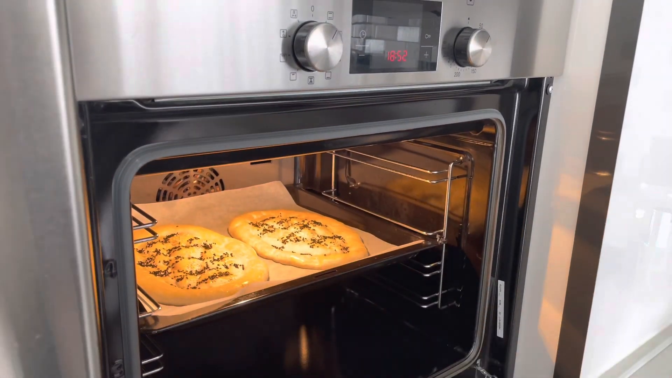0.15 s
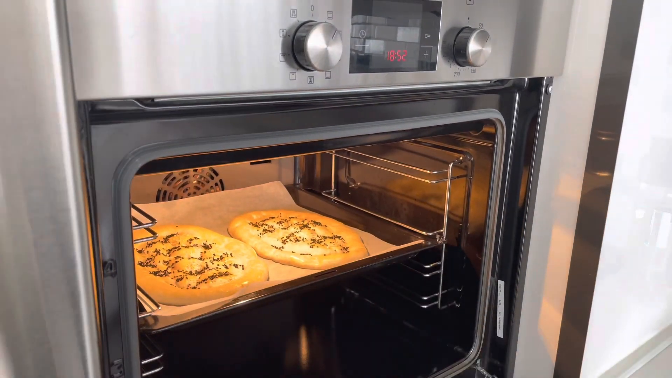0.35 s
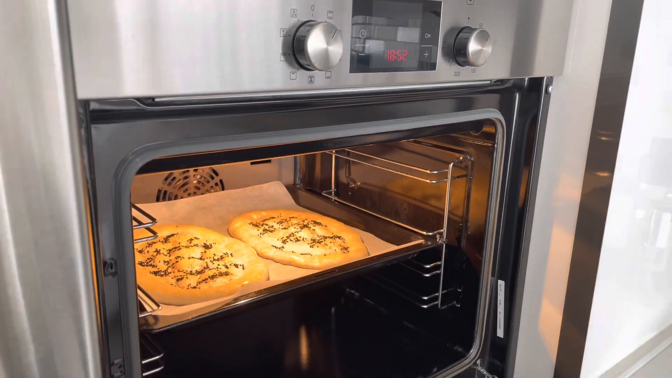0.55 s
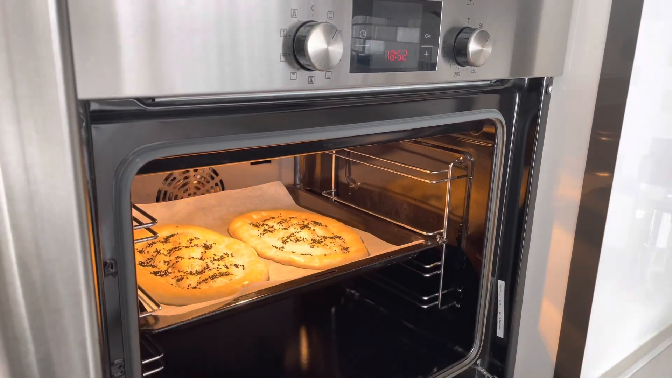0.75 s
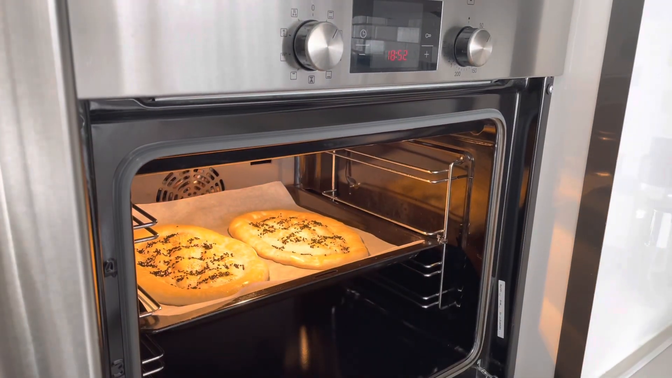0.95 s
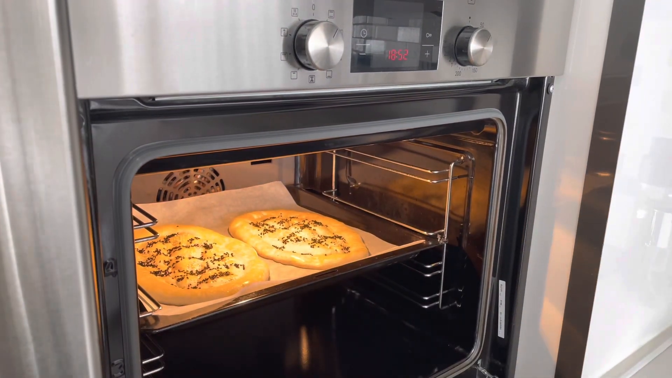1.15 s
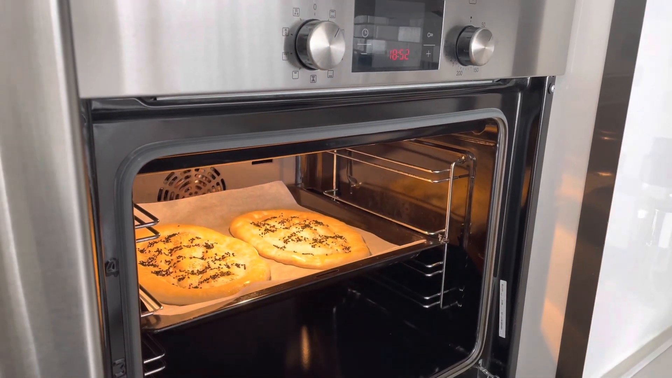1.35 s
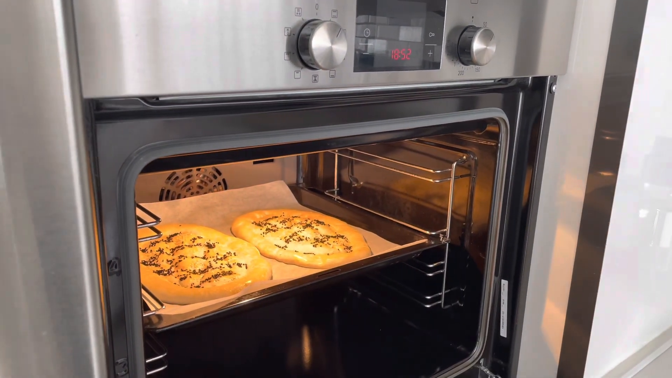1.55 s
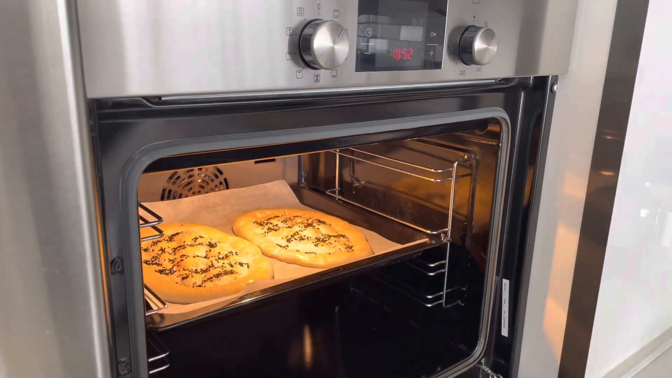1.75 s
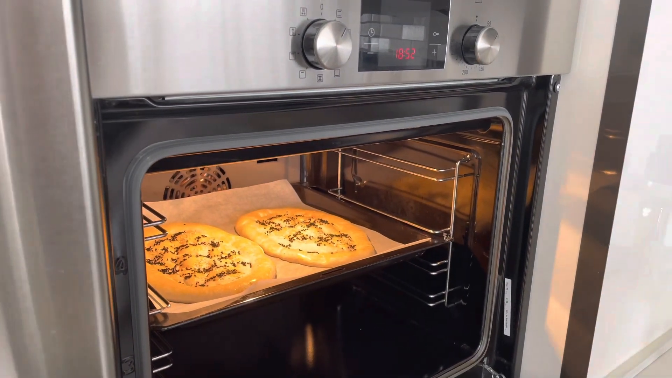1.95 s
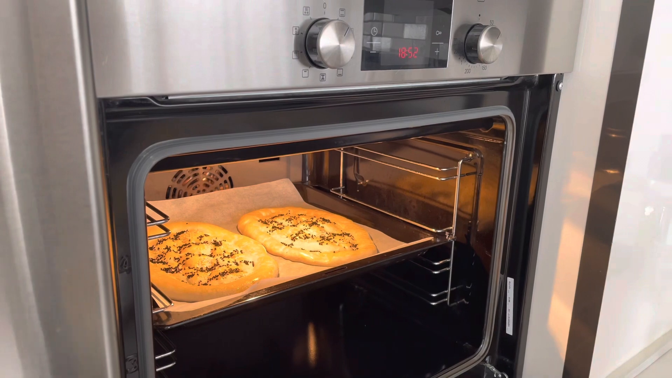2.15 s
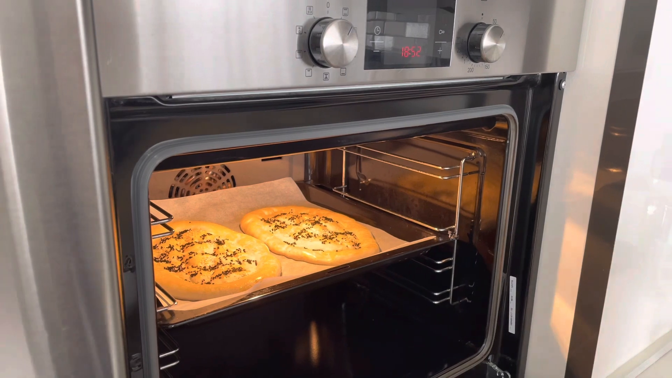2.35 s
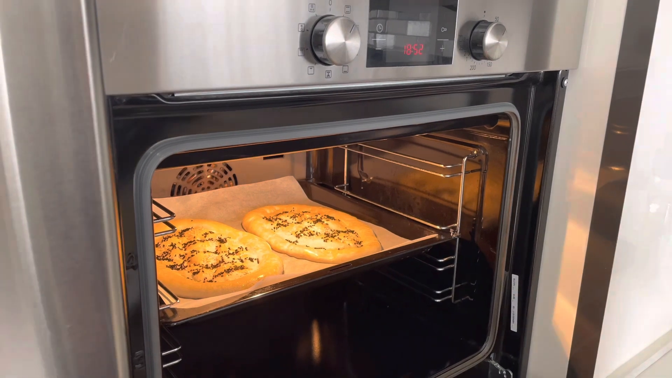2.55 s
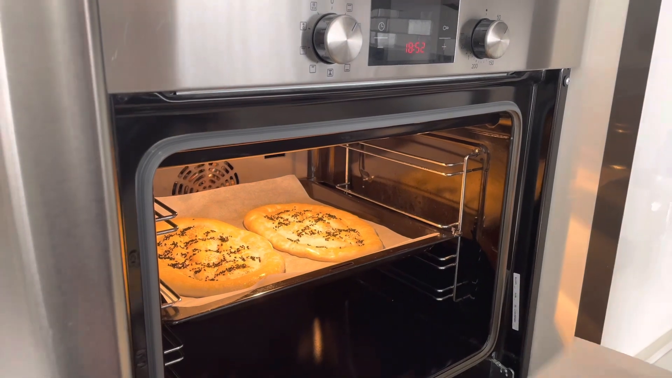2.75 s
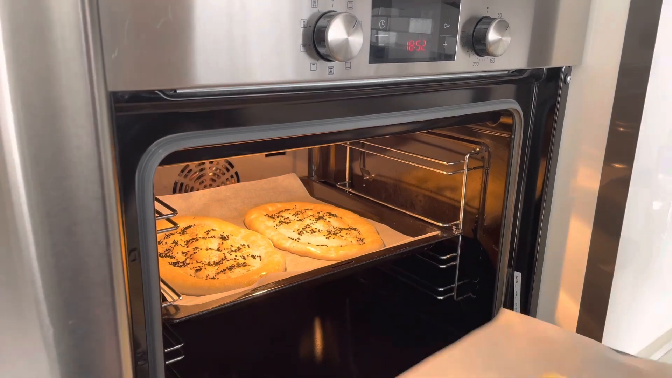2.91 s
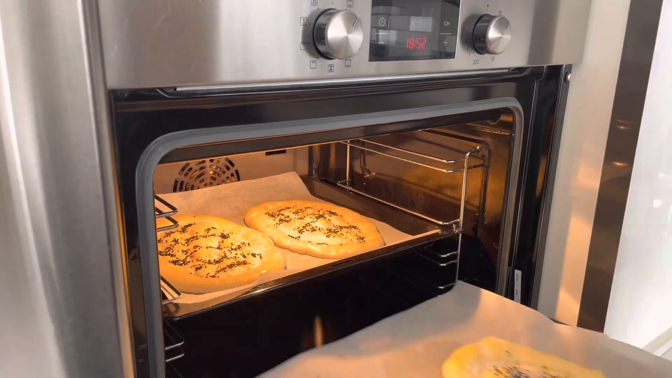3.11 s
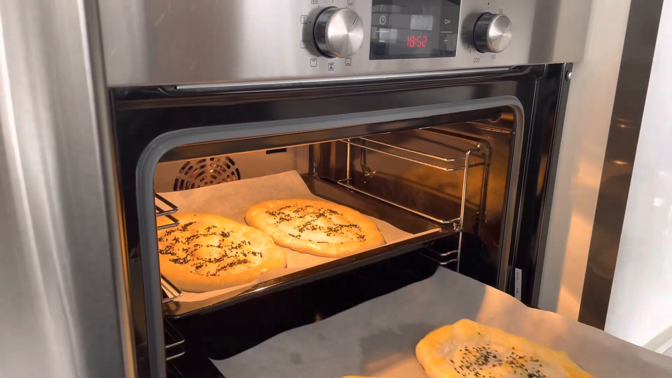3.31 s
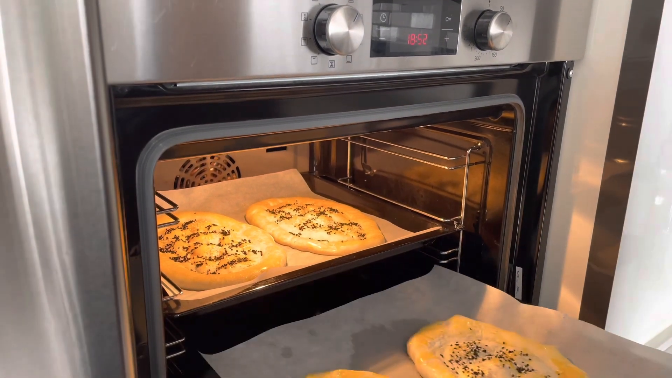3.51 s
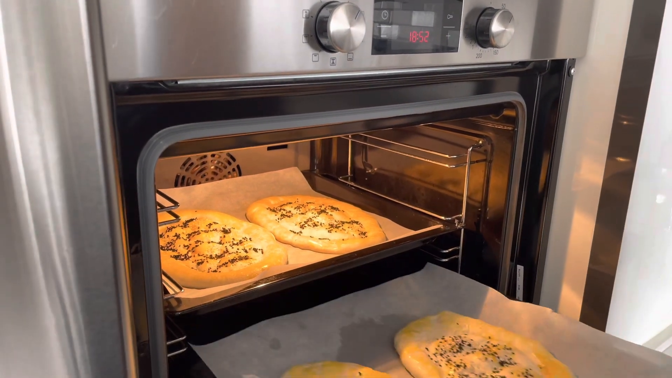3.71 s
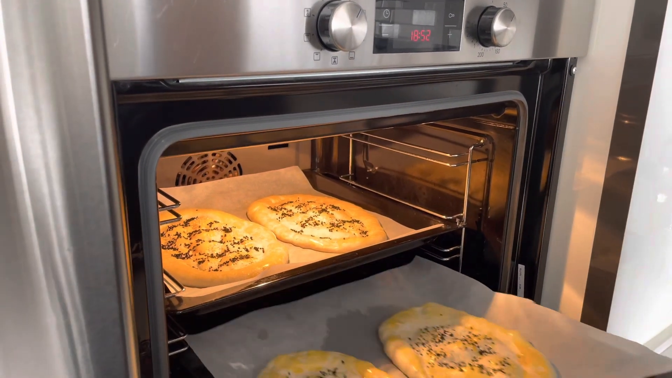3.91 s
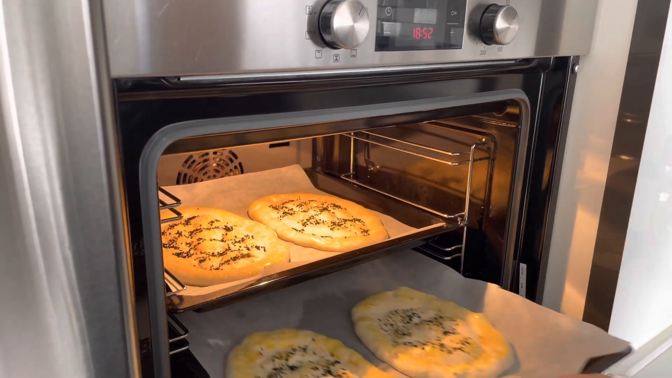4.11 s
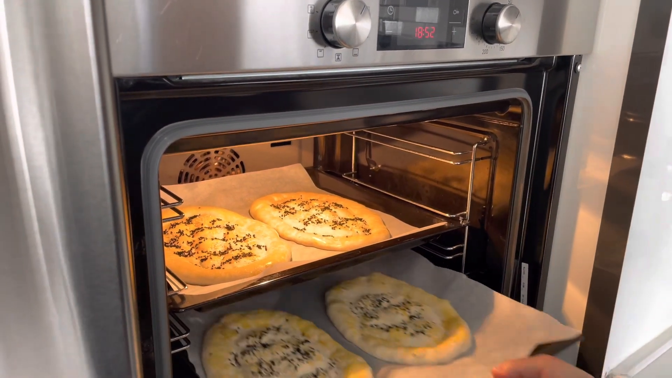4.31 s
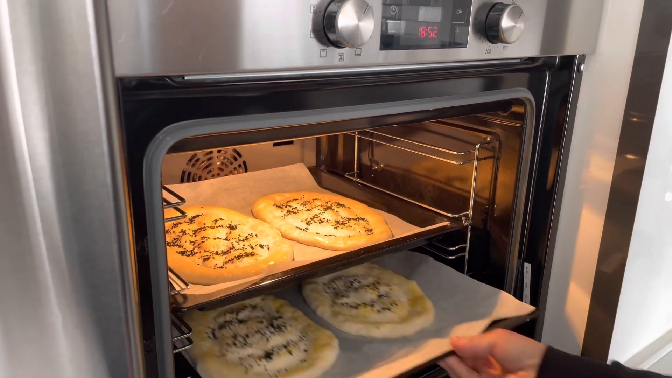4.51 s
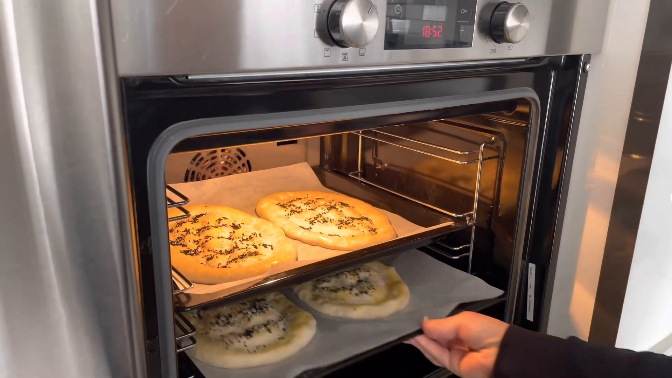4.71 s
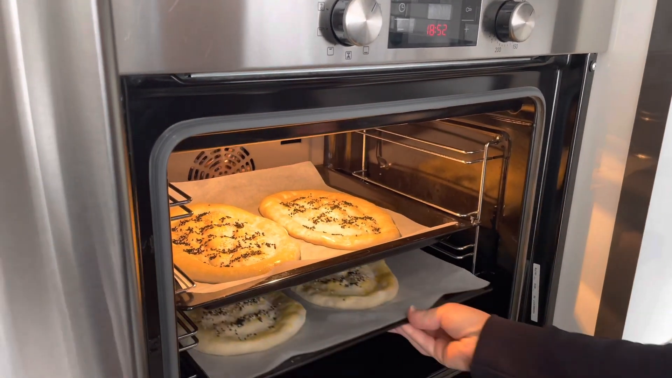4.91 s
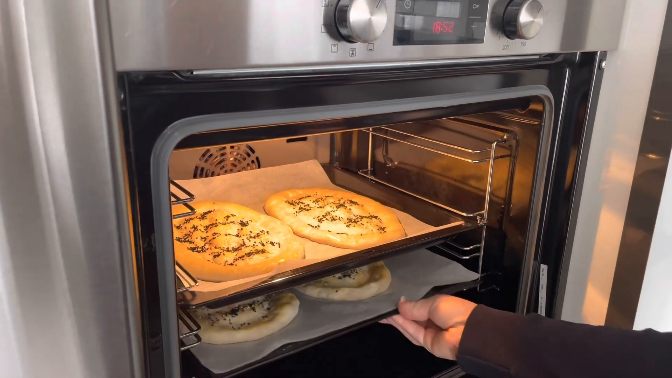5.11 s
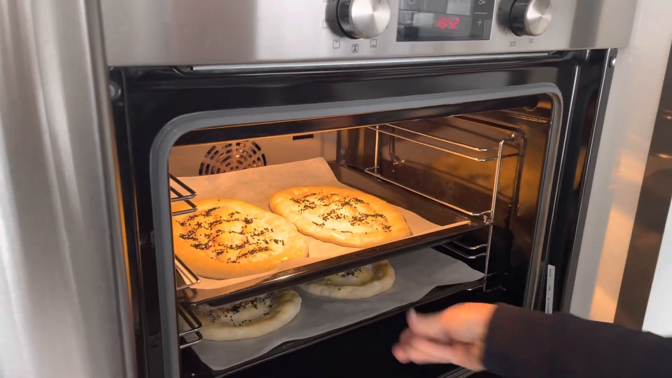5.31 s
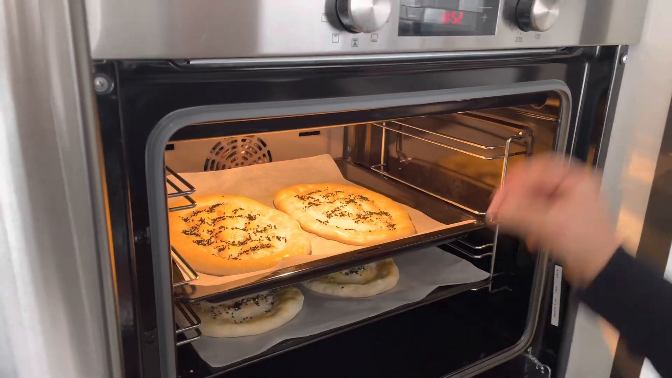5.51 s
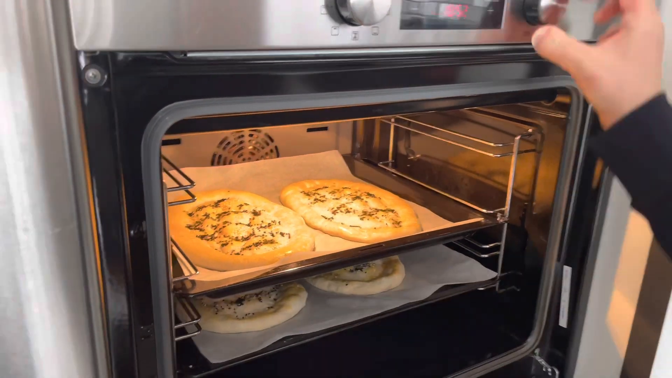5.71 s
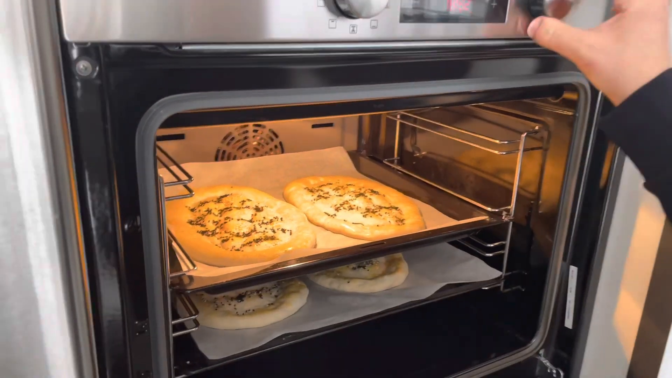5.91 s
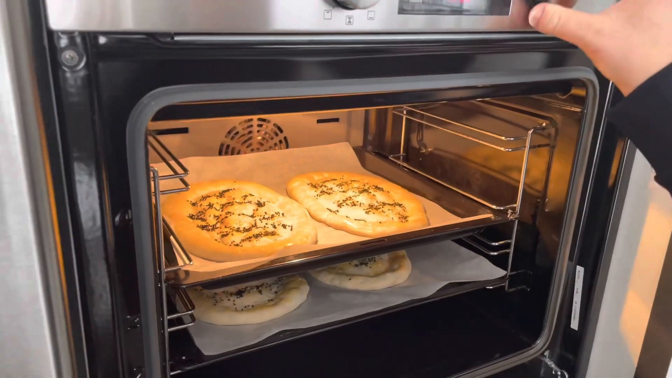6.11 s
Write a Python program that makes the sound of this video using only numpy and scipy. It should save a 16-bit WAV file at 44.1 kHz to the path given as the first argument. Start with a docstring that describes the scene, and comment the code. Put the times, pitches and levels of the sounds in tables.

```python
"""A fan oven hums throughout: steady motor and blade tones over noise coloured by the oven cavity.
First baking paper rustles and creases, made of fine random clicks, with two faint knocks of the tray.
At 3.2 s the tray drops on the wire runners: rattling clicks ring the sheet and oven, the wires ring on, it squeals.
From 3.6 s it slides home, scraping, chattering and singing on the wires, and bumps the back at 5.1 s.
Last the paper gives a short dry tick and shifts softly a few times."""
import sys
import numpy as np
from scipy import signal
from scipy.fft import rfft, irfft, next_fast_len
from scipy.io import wavfile

SR = 44100
rng = np.random.default_rng(int(sys.argv[2]) if len(sys.argv) > 2 else 0)


def output_pcm(signal):
    """Save a mono or channel-first signal as 16-bit PCM at the path in sys.argv[1].

    Samples are clipped to [-1, 1] before scaling.
    """
    pcm = np.clip(np.atleast_2d(signal).T, -1, 1) * 32767
    wavfile.write(sys.argv[1], SR, np.round(pcm).astype(np.int16))


N = 276058

# how alike left and right are for the tray and the paper: hz, likeness (0 to 1)
NEAR_LIKENESS = [(60, 0.96), (300, 0.94), (700, 0.11), (2400, 0.46), (6000, 0.087), (7000, 0.99),
                 (16000, 0.65)]
HZ = np.maximum(np.fft.rfftfreq(next_fast_len(N + SR), 1 / SR), 1)   # frequency axis of all filters
SIZE = 2 * len(HZ) - 2   # samples in the matching Fourier transform
PLACES = 6   # spots on the sheet that meet the wires; knocks use the last only once it is seated, sliding uses all
SEATED_S = 5.05   # from here the sheet rests against the back wall


def tray():
    """Each contact is heard directly and through ringing sheet, oven walls and dense small modes."""
    # main modes of the sheet: pitch_hz, level_db (relative), t60_s (time to fall 60 dB)
    sheet_modes = [(789, -3, .08), (1020, -5, .1), (1283, -4, .08), (1460, -7, .07), (1650, -7, .08),
                   (2160, -4, .07), (2330, 0, .06), (2450, -1, .07), (2750, -5, .06), (2900, -6, .08),
                   (3445, 4, .08), (4250, -12, .04), (4750, -12, .05), (5800, -13, .05)]
    # modes of the oven walls: pitch_hz, level_db (relative), t60_s
    wall_modes = [(88, -4, .2), (110, 3, .15), (140, -4, .15), (160, 0, .2), (192, 0, .13), (216, -1, .2),
                  (290, -6, .13), (372, -5, .3), (412, -4, .15), (487, -1, .18), (545, -10, .3),
                  (630, -12, .3)]
    # dense small modes of sheet and oven box: hz, level_db (per Hz), t60_s (before any seated damping)
    dense_modes = [(59.3, -16, .6), (121, 7.5, .6), (260, 2, 0.4), (535, -2.5, 0.8), (1360, -8, 0.67),
                   (1800, -10.5, .4), (2400, -7.5, 0.36), (3400, -8, 0.3), (5300, -11, 0.25),
                   (8440, -15, 0.21), (12000, -26.5, 0.2), (15830, -23.5, 0.17)]
    seated_decay = .9   # at the last place, held by the back wall, the dense modes die sooner: share of t60

    sharp, struck, push, thud = knock_forces()
    scraping, rubbed, rumbling = scrape_forces()
    sharp, push = sharp + scraping, push + rumbling
    sound = squeal()
    sharp[0] += from_db(7.0) * sound   # the squeal also shakes the sheet at one place
    direct = from_db(at_hz(dense_modes, HZ) - 1.0)
    for k in range(PLACES):
        decay_share = seated_decay if k == PLACES - 1 else 1
        table = np.array(dense_modes) * [1, 1, decay_share]
        wash = rfft(dying_noise(table, NEAR_LIKENESS, early_share=0.2, late_db=-10.5), SIZE)
        sheet = rfft(rings(sheet_modes, spread_db=3.5), SIZE)
        walls = rfft(rings(wall_modes, spread_db=2.5), SIZE)
        rubbed_sheet = rfft(rings(sheet_modes, spread_db=6), SIZE)   # each place rubs its own few modes
        sound = sound + shaped(sharp[k], direct + from_db(2.0) * wash)
        sound = sound + shaped(struck[k], sheet)
        sound = sound + shaped(rubbed[k], rubbed_sheet)
        sound = sound + shaped(push[k], from_db(2.0) + from_db(-6.0) * walls + from_db(-4.0) * wash)
        sound = sound + shaped(thud[k], from_db(-2.5) * walls)
    return sound + wires() + singing()


def knock_forces():
    """Each knock is a burst of chattering clicks with a dull push just after its start."""
    # tray on wire, and last a short dry tick of the paper: start_s, clang_db, clang_centre_hz,
    # treble_db (over clang), chatter_s, ring_db (of the sheet, over clang), thud_db (of the oven box), thud_centre_hz
    knocks = [(1.3985, -41, 940, -18, 0.004, -28, -42.5, 298),
              (2.8737, -51.5, 2640, -8.5, 0.011, -16, -43, 183),
              (3.2302, -12.5, 3000, -8, 0.0054, -2, -15, 195.2),
              (3.2512, -15.5, 1480, 0.5, 0.0056, -23, -25, 115),
              (3.27, -34, 900, -2, 0.0075, -15, -28, 190), (3.3031, -36, 990, -24, 0.0034, -17, -23.5, 200),
              (3.5696, -22.5, 4100, 0, 0.0034, -13, -23.5, 415),
              (3.5955, -58, 1410, -18, 0.0051, -9, -34.5, 110),
              (3.603, -55, 500, -20, 0.0052, -12, -30, 215), (3.6559, -34.5, 3720, 3, 0.0038, -1, -63, 180),
              (3.7303, -43.5, 1200, -39, 0.013, -1, -49, 181),
              (3.7831, -26.5, 3680, 5.5, 0.0049, -3.5, -44, 200),
              (3.7985, -32, 3000, 5, 0.0033, -2, -31, 158), (3.8428, -37, 3000, -5, 0.0097, -12, -49, 200),
              (3.889, -46, 2500, -18, 0.0083, -3, -38, 95), (3.893, -67, 1000, -20, .01, -9, -31.5, 485),
              (3.912, -58, 500, -20, .006, -16, -33.5, 215),
              (3.9505, -42.5, 4830, -4, 0.025, -14, -67, 200),
              (3.986, -51, 3460, -23, 0.0084, -1, -49, 200),
              (4.0244, -38.5, 2520, -19, 0.0063, -1, -42, 397),
              (4.084, -35.5, 3560, -21.5, 0.008, 1, -65, 200),
              (4.094, -32.5, 2620, -13, 0.012, -3.5, -90, 200),
              (4.1104, -43.5, 1300, -5, 0.01, -8, -63, 260),
              (4.127, -39.5, 4000, -15, 0.0055, -4, -70, 200),
              (4.1839, -38.5, 2010, -22, 0.011, -17, -49, 300),
              (4.203, -36, 2900, -15, 0.01, -8.5, -34, 300),
              (4.2653, -40, 2330, -19, 0.0099, -0.5, -39, 298),
              (4.279, -21.5, 2530, -0.5, 0.0067, -1, -60, 410),
              (4.3025, -23, 3540, 6.5, 0.0062, -3, -24.5, 380),
              (4.4608, -40.5, 2500, -11, 0.013, 6, -53, 160), (4.4982, -41, 3150, -15, 0.0057, 7, -55, 200),
              (4.577, -23.5, 3000, -1.5, 0.0042, -6, -26.5, 400),
              (4.5954, -27, 3300, -2, 0.008, -1.5, -33, 140),
              (4.7027, -34.5, 1500, -6, 0.01, -12, -29, 450),
              (4.764, -36, 1130, -25, 0.0049, -6, -37.5, 200),
              (5.1038, -35, 2180, -8, 0.0079, -26, -39, 181),
              (5.1313, -19.5, 2240, -21, 0.0095, -34, -18.5, 375),
              (5.1426, -39, 916, 10, 0.0075, -26, -25, 155), (5.153, -45, 600, -20, .005, -26, -27.5, 129),
              (5.204, -44, 700, -23, 0.012, -14, -28.5, 303),
              (5.3235, -46, 4300, -5, 0.0047, -25, -75, 302)]
    touch_s, weight_lag_s = 0.0048, 0.008   # shorter chatter starts with a stronger crack; the weight lands late
    wall_pick = 1.06   # a thud drives the walls mainly within this ratio of its centre

    sharp, struck, push, thud = np.zeros((4, PLACES, N))
    t = np.arange(SR // 10) / SR
    hits = grains(per_s=11000, spread_db=1)
    weight = 1.0 * (np.arange(len(t)) == round(weight_lag_s * SR))   # a single click
    for k, (s, clang_db, centre_hz, treble_db, chatter_s, ring_db, thud_db, thud_hz) in enumerate(knocks):
        at = round(s * SR)
        span = slice(at, at + len(t))
        place = PLACES - 1 if s > SEATED_S else k % (PLACES - 1)
        chatter_s = max(chatter_s, .002)

        fading = np.exp(-(t / chatter_s) ** 3)
        rattle = hits[span] * fading
        rattle *= np.sqrt(np.sum(fading ** 2) / np.sum(rattle ** 2))   # same energy whatever the chance clicks
        rattle[0] = 5 * min(touch_s / chatter_s, 1) ** 2   # first touch
        clang = band(rattle, centre_hz / 3.03, centre_hz * 2.18)
        clang += from_db(treble_db) * band(rattle, 5500, 12920, order=1)
        sharp[place, span] += from_db(clang_db) * clang
        struck[place, span] += from_db(clang_db + ring_db) * clang

        dull = band(weight, thud_hz / 1.6, thud_hz * 2.53)
        narrow = band(weight, thud_hz / wall_pick, thud_hz * wall_pick, order=1)
        push[place, span] += from_db(thud_db) * dull / dull.max()
        thud[place, span] += from_db(thud_db) * narrow / dull.max()
    return sharp, struck, push, thud


def scrape_forces():
    """Sliding is a stream of uneven clicks that moves between places and stumbles on the wires."""
    # the slide: time_s, scrape_db, dull_db (over scrape), ring_db (of the sheet, over scrape), rumble_db
    slide = [(3.6, -68, -20, -4, -41.5), (3.76, -51.5, 4.5, -1.5, -40), (3.81, -55, 6, -13, -33),
             (3.87, -44, -10, -8, -36), (3.93, -49, -25, -17, -42.5), (4.0, -47.5, -39, -3, -46),
             (4.06, -44, -11, -9, -40.5), (4.12, -43, -21, -18, -49), (4.17, -45.5, -16, -26, -39.5),
             (4.22, -45, -19, -10, -46.5), (4.33, -45, 4.5, -26, -35), (4.42, -42, -9, -24, -46),
             (4.53, -44, -17, -20, -52), (4.61, -42, -1, -22, -35), (4.75, -49, 0, -28, -40.5),
             (4.85, -53, 1.5, -29, -42.5), (4.97, -60, 2.5, -31, -43.5), (5.1, -63, 1, -28, -47)]
    wander_db, wander_per_s = 10, 12   # the contact moves between places on the sheet
    stumble_db = 3.5   # unevenness of the wires

    scrape_db, dull_db, ring_db, rumble_db = in_time(slide)
    catches = grains(per_s=160, spread_db=3.5)   # lone catches of the rim
    rough = grains(per_s=1500, spread_db=5.0) + from_db(-1) * catches
    dull = from_db(dull_db) * band(rough, 283, 2080)
    hiss = from_db(-8.5) * band(rough, 8100, 19000)
    sharp = band(rough, 1320, 6550, order=1) + dull + hiss
    jolts = band(grains(per_s=700, spread_db=2), 90, 480)

    share = np.array([from_db(wander_db * drift(wander_per_s)) for k in range(PLACES)])
    share /= np.sqrt(np.sum(share ** 2, axis=0))   # the places share one total power
    grip = share * from_db(stumble_db * drift(8.7))
    scraping = grip * sharp * from_db(scrape_db)
    ringing = from_db(ring_db) * band(rough, 2160, 3300) + from_db(-6.0) * dull
    rubbed = grip * from_db(scrape_db) * ringing
    return scraping, rubbed, grip * jolts * from_db(rumble_db)


def squeal():
    """Uneven slips at a high rate: a wide wobbling tone with its octave, throbbing."""
    slip_hz, slow_wander_hz, fast_wander_hz = 7160, 60, 200
    rate_hz = slip_hz + slow_wander_hz * drift(60) + fast_wander_hz * drift(550)
    turn = 2 * np.pi * np.cumsum(rate_hz) / SR
    throb_db = -18 + 1.1 * drift(150)
    level = tent(3.252, throb_db, rise_db_per_s=5010.5, fall_db_per_s=518.5, hold_s=0.017)
    return level * (np.sin(turn) + from_db(-13.5) * np.sin(2 * turn))


def wires():
    """Free rack wires ring on after the drop; each bends in two planes whose close pitches beat."""
    # modes of the rack wires: pitch_hz, level_db (relative), t60_s, split_hz (between the two planes)
    wire_modes = [(553, 1, 3, 2.4), (684, -12, .6, 6), (1012, -8, .9, 1.9), (1055, -9, 1.5, 5),
                  (1276, -9, .3, 7), (1432, -11, 3, 3), (1545, -16, 1.2, 5), (1690, -15, .5, 6),
                  (2379, -14, .7, 5), (2449, -7, 1.2, 3), (2654, -16, .4, 8), (2907, -8, .8, 4.5),
                  (3210, -13, .6, 6), (3564, -9, .4, 7), (4005, -11, .6, 5), (6202, -7, .55, 8),
                  (6298, -2, .75, 3), (6578, -12, .3, 7), (10600, -6, .3, 10)]
    # the drop plucks the wires, the tray's weight stills them: start_s, level_db, damped_from_s, damping_db_per_s
    landing = (3.231, -41, 3.62, 120)
    twin_db = -5   # the second plane, struck against the first
    start_s, level_db, damped_s, damping_db_per_s = landing
    t = np.arange(N) / SR
    age = np.maximum(t - start_s, 0)
    ring = 0
    for hz, db, t60, split_hz in wire_modes:
        level = from_db(db - 60 * age / t60 + 2 * drift(20))
        first = np.sin(2 * np.pi * hz * age)
        twin = from_db(twin_db) * np.sin(2 * np.pi * (hz + split_hz) * age)
        ring = ring + level * (first - twin)
    return from_db(level_db - damping_db_per_s * np.maximum(t - damped_s, 0)) * ring


def singing():
    """Rubbing sets single resonances singing, some briefly, some at length: rough tones that swell, waver and fade."""
    # singing tones: loudest_s, pitch_hz, level_db, half_length_s (to 20 dB down; its sign does not matter)
    songs = [(3.67, 790, -50, 0.12), (4.016, 3440, -53, 0.15), (4.065, 1427, -58, 0.43),
             (4.11, 1040, -47.5, 0.03), (4.253, 2612, -51, 0.3), (4.35, 1534, -47, -0.02),
             (4.356, 464.6, -46.5, 0.46), (4.424, 1000, -48, 0.04), (4.65, 1660, -44.5, -0.04),
             (4.724, 1590, -53, 0.32), (4.726, 1210, -51, 0.2), (4.805, 1000, -48, -0.2),
             (4.89, 1013, -57.5, 0.43)]
    wander_hz, flutter_db = 35, 5
    t = np.arange(N) / SR
    sound = 0
    for s, hz, db, half_s in songs:
        level = swell(s, db + flutter_db * drift(71), half_s, half_s)
        wander = np.cumsum(wander_hz * drift(50.5)) / SR
        sound = sound + level * np.sin(2 * np.pi * (hz * t + wander))
    return sound


def paper():
    """Shifting paper is clumped fine crackle with single creases, heard with the kitchen's short tail."""
    # shifting paper: loudest_s, level_db, swell_s, fade_s (each over 20 dB), treble_db (over level)
    rustles = [(0.39, -81, 0.46, 0.21, 24), (0.83, -57.5, 0.05, 0.22, -26), (1.24, -54.5, 0.14, 0.14, 0.5),
               (1.49, -50.5, 0.12, 0.059, -7), (1.618, -51.5, 0.021, 0.035, -5),
               (1.67, -51.5, 0.027, 0.035, -9), (1.79, -52, 0.039, 0.11, -12),
               (1.905, -50.5, 0.016, 0.032, -10), (2.0, -76, 0.03, 0.14, 8), (2.46, -70.5, 0.13, 0.64, -10),
               (2.81, -54, 0.023, 0.054, -31), (2.89, -50, 0.11, 0.1, -52),
               (5.449, -56.5, 0.035, 0.045, -27), (5.79, -75.5, 0.088, .06, 11.5),
               (6.03, -69, 0.13, 0.12, -4.5)]
    # single creases: start_s, peak_db, treble_db (over peak)
    creases = [(0.824, -42, -31), (1.227, -47, 1), (1.618, -43, -25), (1.667, -42, -21), (1.75, -51.5, 19),
               (1.786, -47, 2), (1.8983, -58, 20), (1.963, -48, 24), (2.758, -49, -31), (2.795, -47, -25)]
    # tone of paper: hz, level_db (per Hz)
    paper_tone = [(300, -26), (900, -0.5), (2000, -4), (3500, -2.5), (6000, -11.5), (8000, -13.5),
                  (11000, -25), (16000, -32.5)]
    # tail of the room: hz, level_db (per Hz), t60_s
    kitchen = [(99.4, 0, 0.28), (3000, 0.5, 0.58), (16100, -0.5, 0.13)]
    crease_s = 0.0042

    level = sum(swell(s, db, rise, fade) for s, db, rise, fade, _ in rustles)
    bright = sum(swell(s, db + treble, rise, fade) for s, db, rise, fade, treble in rustles)
    s, peak_db, treble_db = np.transpose(creases)
    fine = grains(per_s=1500, spread_db=-3.5)
    force = fine * (level * from_db(2.0 * drift(31)) + bursts(s, peak_db, crease_s))
    sharp = fine * (bright + bursts(s, peak_db + treble_db, crease_s))
    force += np.diff(sharp, prepend=0)   # differences between samples favour the treble
    tail = rfft(dying_noise(kitchen, NEAR_LIKENESS, early_share=0.16, late_db=-4.5), SIZE)
    return shaped(force, from_db(at_hz(paper_tone, HZ)) * (1 + from_db(3.0) * tail))


def fan():
    """Motor and blade tones that waver a little, over air noise coloured by the cavity."""
    # motor and blade tones: pitch_hz, level_db, waver_hz
    hum_tones = [(48.4, -45, 0.069), (88.4, -48, 0.31), (99, -62, 0.37), (145.2, -60.5, 1),
                 (200, -60.5, 1.99), (447.4, -64.5, 1.5)]
    # tone of the moving air: hz, level_db (per Hz, relative)
    air_tone = [(30, -14.5), (45, 9), (100, 3.5), (280, -1), (460, -10), (650, -8), (1500, -13),
                (3000, -26), (6000, -33), (10000, -43), (16000, -53)]
    # resonances of the oven cavity: centre_hz, width_hz, peak_db (over the air)
    cavity = [(450, 140, 4.5), (1043, 168, 3), (1543, 46, 3), (2335, 180, 6), (3010, 300, 8),
              (3940, 180, 1.5)]
    # how alike the air is left and right: hz, likeness (0 to 1)
    air_likeness = [(60, 0.85), (130, 0.93), (290, 0.8), (640, 0.24), (5000, 0.76), (6800, 0.92),
                    (16000, 1)]
    air_db = -53

    t = np.arange(N) / SR
    hum = 0
    for hz, db, waver_hz in hum_tones:
        level = from_db(db + 1.0 * drift(9.7))
        waver = np.cumsum(waver_hz * drift(7.2)) / SR
        hum = hum + level * np.sin(2 * np.pi * (hz * t + waver))
    peaks = 1 + sum(from_db(db) / (1 + (2 * (HZ - hz) / width) ** 2) for hz, width, db in cavity)
    air = rms_one(shaped(pair(air_likeness, N), from_db(at_hz(air_tone, HZ)) * peaks))
    return hum + from_db(air_db + 0.4 * drift(9.7)) * air


def from_db(db):
    """Gain of a level in dB."""
    return 10 ** (np.asarray(db) / 20)


def rms_one(x):
    """Scaled to unit power."""
    return x / np.sqrt(np.mean(x ** 2) + 1e-20)


def in_time(rows, silent=-120):
    """Columns as curves over time, silent outside the rows."""
    s, *columns = np.transpose(rows)
    return [np.interp(np.arange(N) / SR, s, c, silent, silent) for c in columns]


def at_hz(points, hz, column=1):
    """A column read on a log-frequency axis."""
    points = np.array(points)
    return np.interp(np.log(hz), np.log(points[:, 0]), points[:, column])


def shaped(x, response):
    """Filter by a frequency response given on HZ."""
    return irfft(rfft(x, SIZE) * response, SIZE)[..., :N]


def band(x, low_hz, high_hz, order=2):
    """Band-pass filter, with its edges kept between 30 and 20000 Hz."""
    edges = np.clip([low_hz, high_hz], 30, 20000)
    return signal.sosfilt(signal.butter(order, edges, "band", fs=SR, output="sos"), x)


def drift(rate):
    """Slow random curve of unit power: noise smoothed twice, above about `rate` Hz."""
    r = np.exp(-2 * np.pi * rate / SR)
    noise = rng.standard_normal(N + SR)
    return rms_one(signal.lfilter([1], [1, -2 * r, r * r], noise)[SR:])   # skip the first second to settle


def grains(per_s, spread_db):
    """Random clicks of uneven size and either sign, at unit power."""
    sizes = from_db(spread_db * np.minimum(rng.exponential(1, N), 4)) * rng.choice([-1, 1], N)
    return rms_one(sizes * (rng.random(N) < per_s / SR))


def pair(likeness, length):
    """Two white noises, as alike at each frequency as the table says."""
    mid, side = rfft(rng.standard_normal((2, length)), SIZE)
    alike = np.clip(at_hz(likeness, HZ), 0, 1)
    shared, opposed = np.sqrt(.5 + alike / 2) * mid, np.sqrt(.5 - alike / 2) * side
    return irfft(shared + opposed * [[1], [-1]])[:, :length]


def rings(modes, spread_db):
    """Impulse response of dying modes, each with a chance strength and slight detuning; unit energy."""
    detune = .006   # pitches shift a little from place to place
    t = np.arange(SR) / SR
    chance = rng.standard_normal((len(modes), 2))
    out = 0
    for (hz, db, t60), (a, b) in zip(modes, chance):
        level = from_db(db + spread_db * a - 60 * t / t60)
        out = out + level * np.sin(2 * np.pi * hz * (1 + detune * b) * t)
    return out / np.sqrt(np.sum(out ** 2))


def dying_noise(table, likeness, early_share, late_db):
    """Stereo impulse response: third-octave noise bands, each with a quick first decay and a slow one."""
    t, out = np.arange(SR // 2) / SR, 0
    white = pair(likeness, SR // 2), pair(likeness, SR // 2)   # neighbouring bands are unrelated
    edges = 45 * 2 ** np.arange(0, 8.7, 1 / 3)
    for k, (low, high) in enumerate(zip(edges, edges[1:])):
        hz = np.sqrt(low * high)
        noise = signal.sosfilt(signal.butter(2, [low, high], "band", fs=SR, output="sos"), white[k % 2])
        t60 = at_hz(table, hz, column=2)
        decay = from_db(-60 * t / (t60 * early_share)) + from_db(late_db - 60 * t / t60)
        out = out + noise * from_db(at_hz(table, hz)) * decay / np.sqrt(t60)
    return out / np.sqrt(np.mean(np.sum(out ** 2, axis=1)))


def bursts(times, levels_db, length_s):
    """Gain where each burst starts at once and dies out."""
    out, t = np.zeros(N), np.arange(SR // 8) / SR
    for s, db in zip(times, levels_db):
        at = round(s * SR)
        out[at:at + len(t)] += from_db(db) * np.exp(-(t / length_s) ** 2)
    return out


def tent(peak_s, db, rise_db_per_s, fall_db_per_s, hold_s):
    """Gain that climbs to a peak, holds and falls, straight in dB."""
    t = np.arange(N) / SR - peak_s
    rise_db = rise_db_per_s * np.minimum(t, 0)
    fall_db = fall_db_per_s * np.maximum(t - hold_s, 0)
    return from_db(db + rise_db - fall_db)


def swell(peak_s, db, swell_s, fade_s):
    """Rounded gain, 20 dB down a swell before the peak and a fade after it."""
    t = np.arange(N) / SR - peak_s
    return from_db(db - 20 * (t / np.where(t < 0, swell_s, fade_s)) ** 2)


def scene():
    """The tray leans mostly left; paper and fan are spread between both sides."""
    # place of the tray: hz, left_over_right_db
    tray_pan = [(60, 2.5), (110, -0.5), (200, 0), (380, -1.5), (700, 1.5), (1290, 4.5), (2380, 3),
                (4400, 4), (8120, -0.5), (15000, 0)]
    pan = from_db(at_hz(tray_pan, HZ) / 2 * [[1], [-1]])
    return shaped(tray(), pan) + paper() + fan()


def record(dry):
    """The two microphone ports part in phase towards the treble; deep bass and the top are cut."""
    # phase between the ports: hz, left_lead_radians
    port_phase = [(0, 0), (1700, .3), (2000, -.4), (3100, 1.1), (3600, .2), (5500, -.2), (6700, -3.1),
                  (8200, -3.5), (10000, -6.2), (12000, -6.5), (13500, -9.4), (17000, -9.6)]
    lead = np.interp(HZ, *np.transpose(port_phase))
    ports = shaped(dry, np.exp(.5j * lead * [[1], [-1]]))
    ports = signal.sosfilt(signal.butter(6, 40, "high", fs=SR, output="sos"), ports)
    top_cut = signal.cheby2(12, 70, 16800, fs=SR, output="sos")   # 70 dB down from 16800 Hz up
    return signal.sosfilt(top_cut, ports)


dry = scene()
out = record(dry)
output_pcm(out)
```